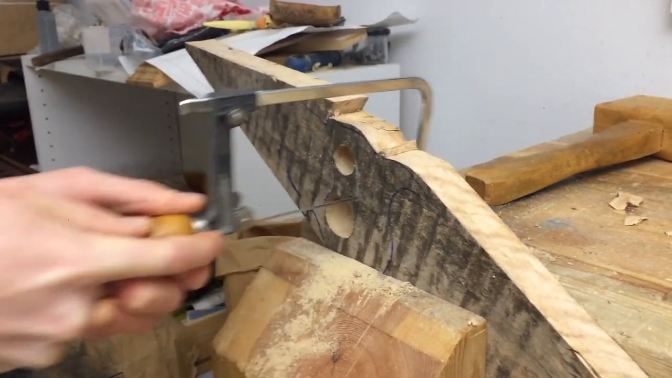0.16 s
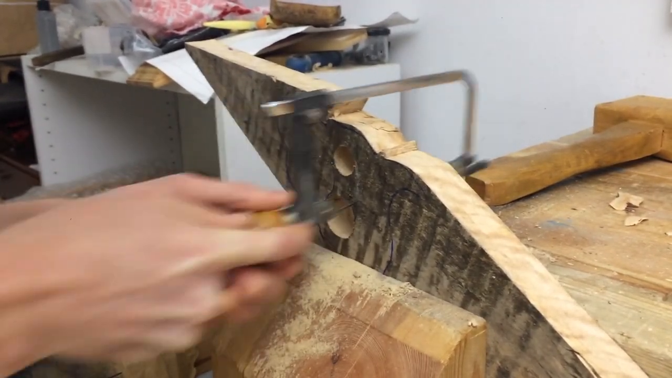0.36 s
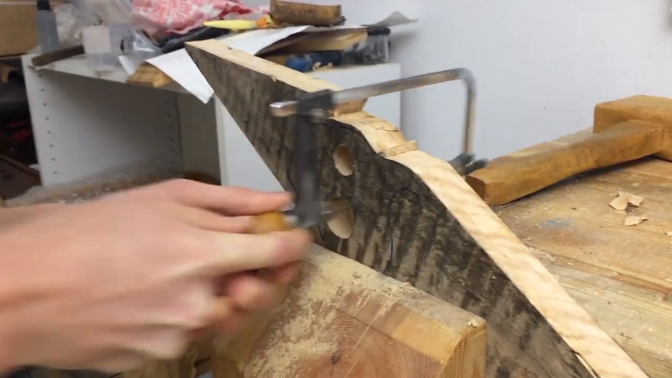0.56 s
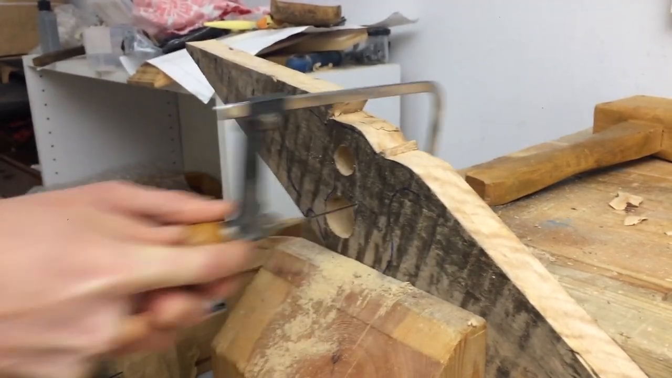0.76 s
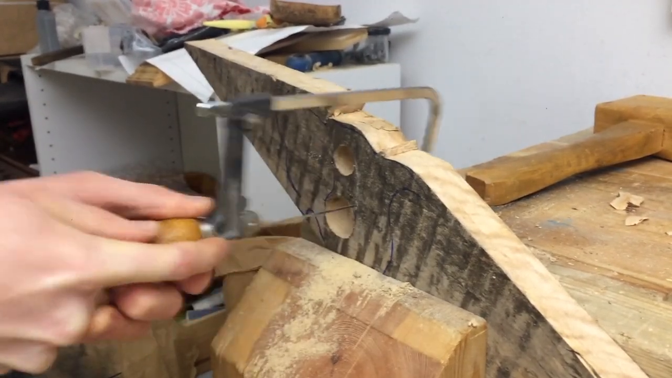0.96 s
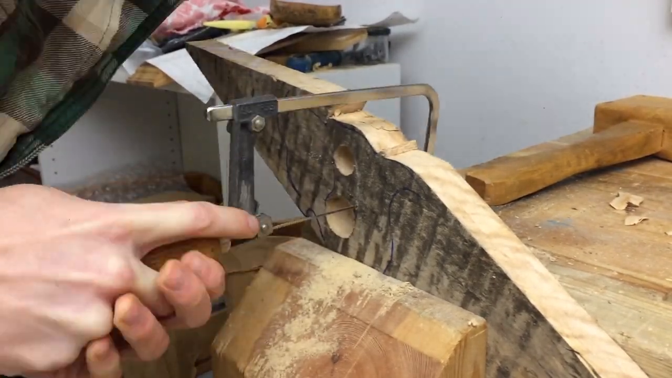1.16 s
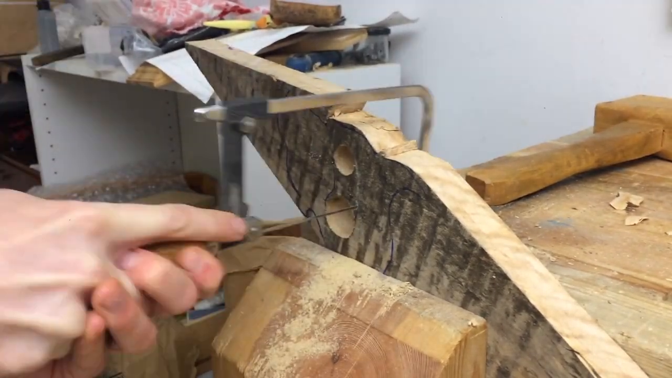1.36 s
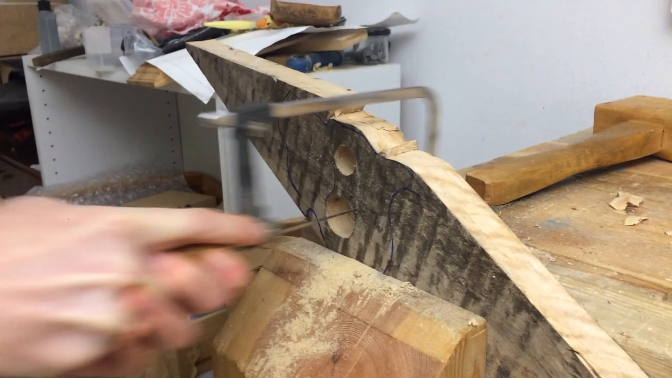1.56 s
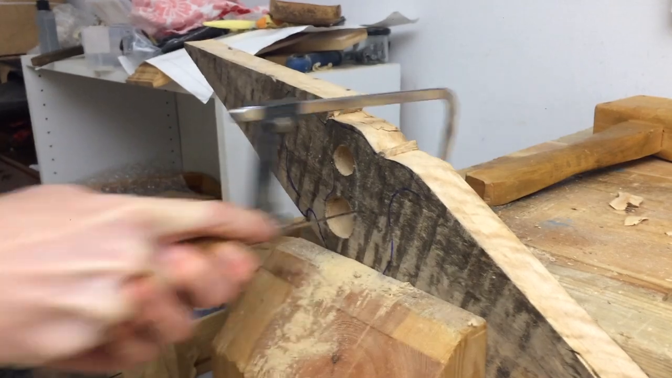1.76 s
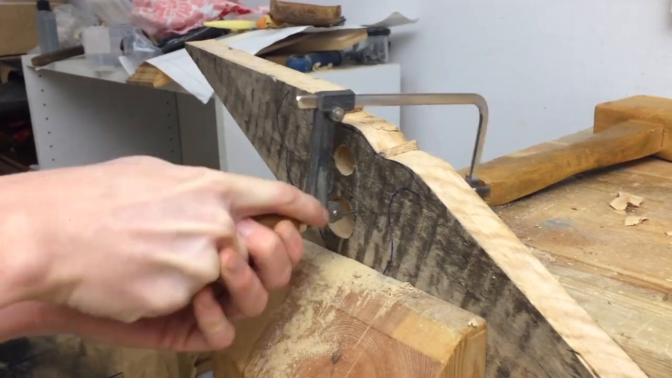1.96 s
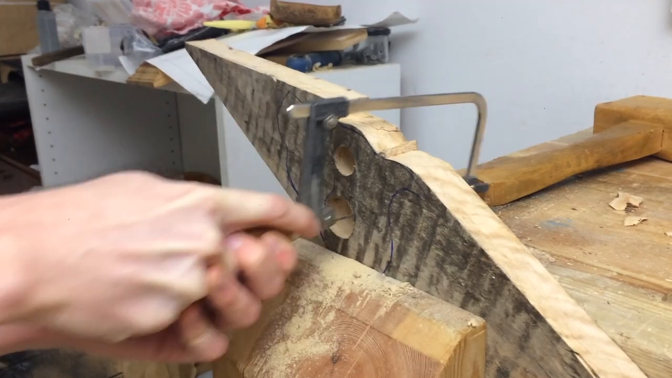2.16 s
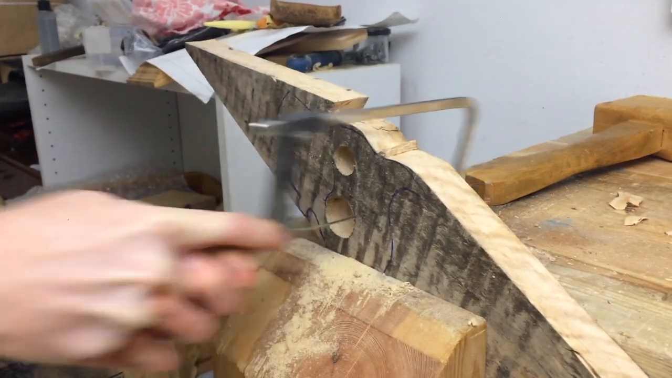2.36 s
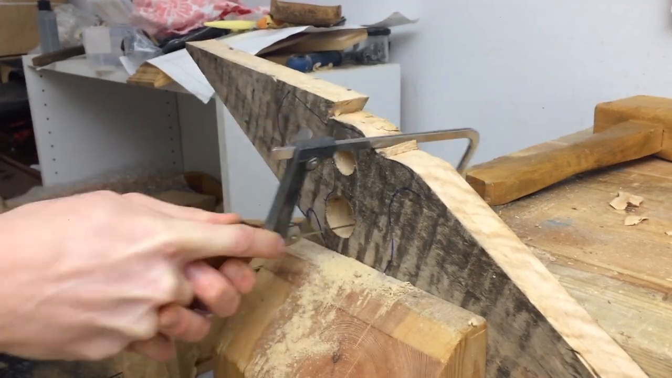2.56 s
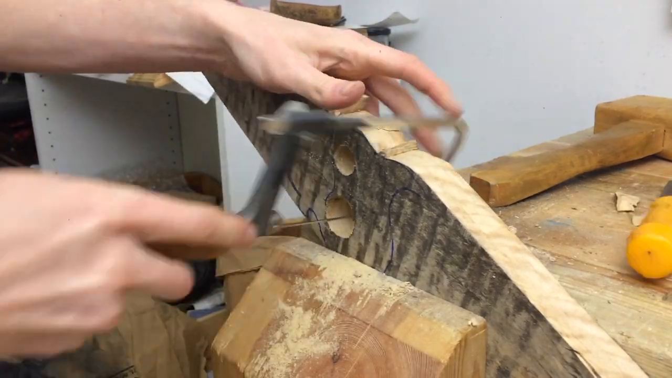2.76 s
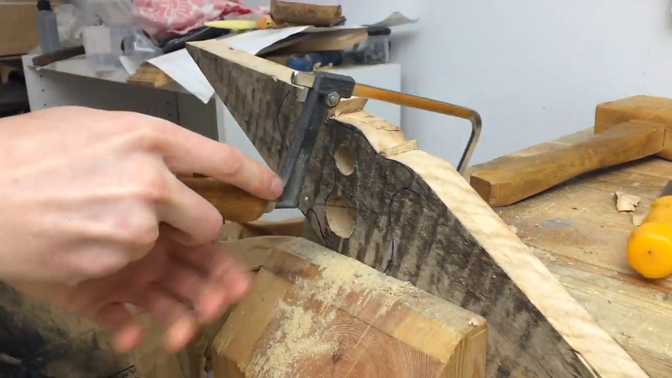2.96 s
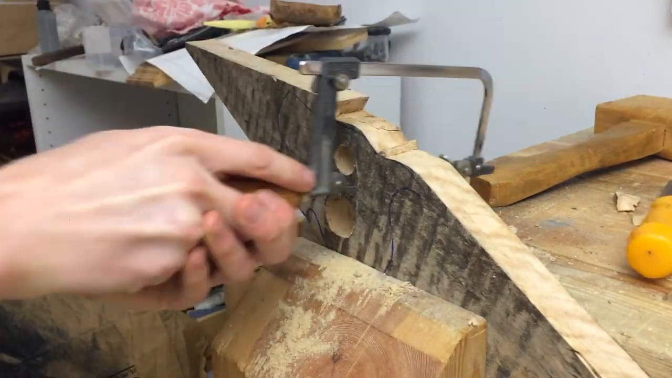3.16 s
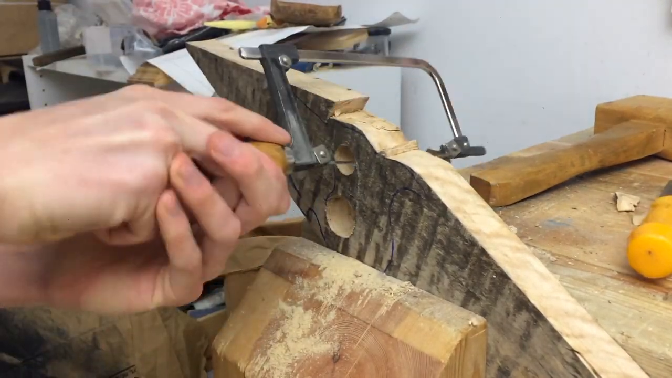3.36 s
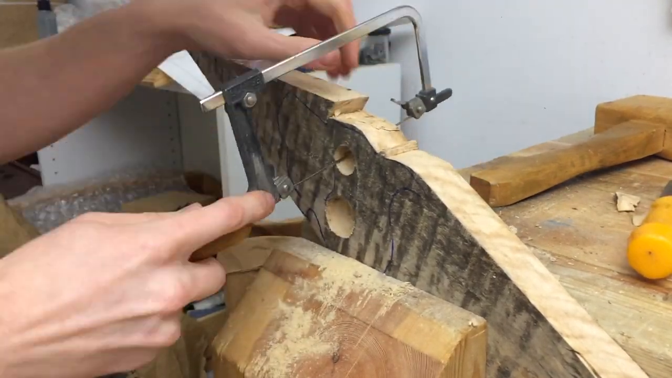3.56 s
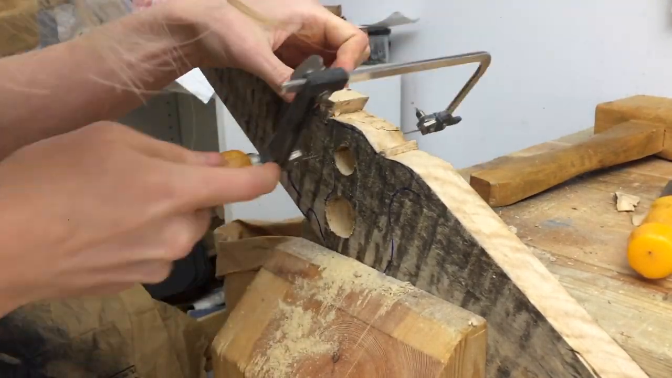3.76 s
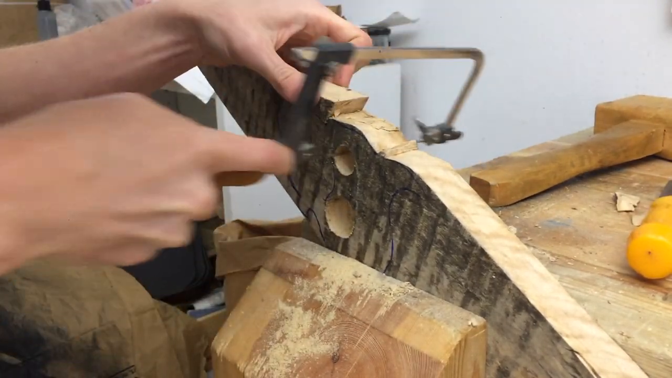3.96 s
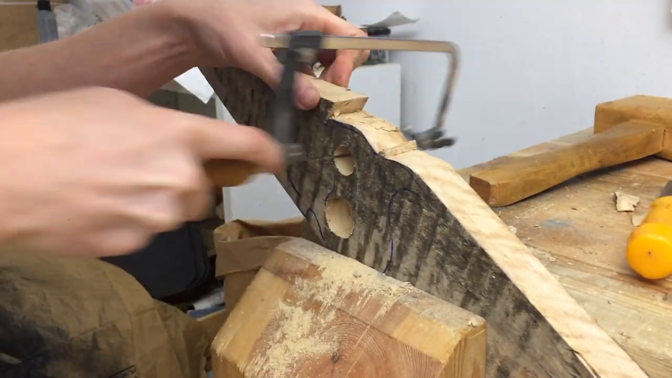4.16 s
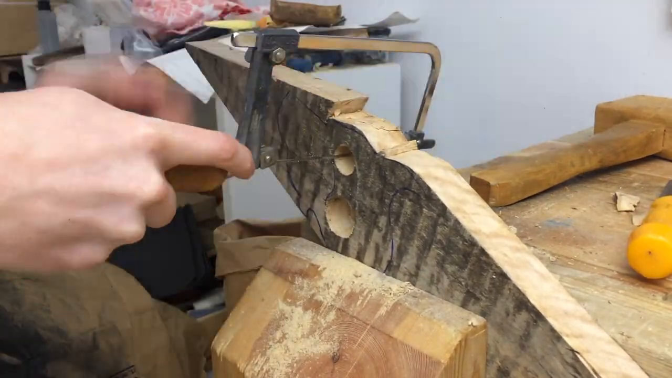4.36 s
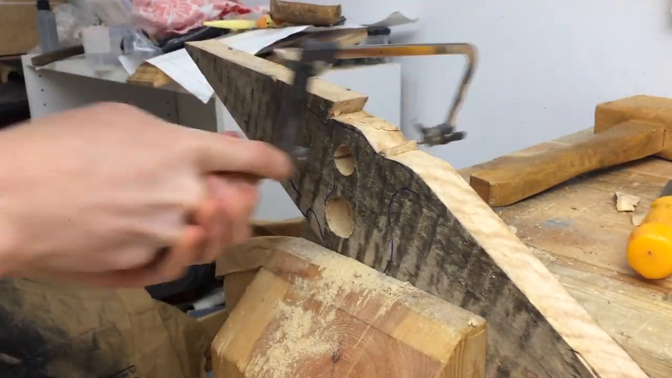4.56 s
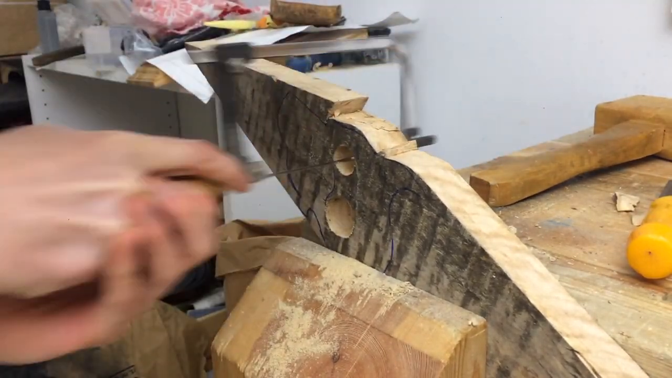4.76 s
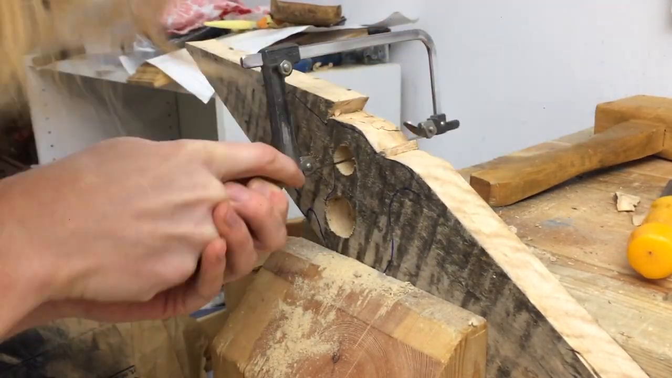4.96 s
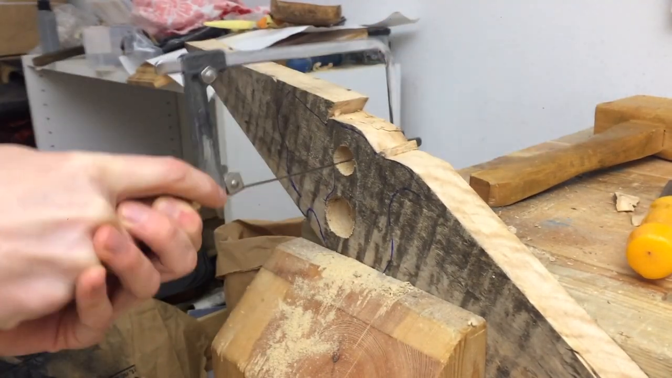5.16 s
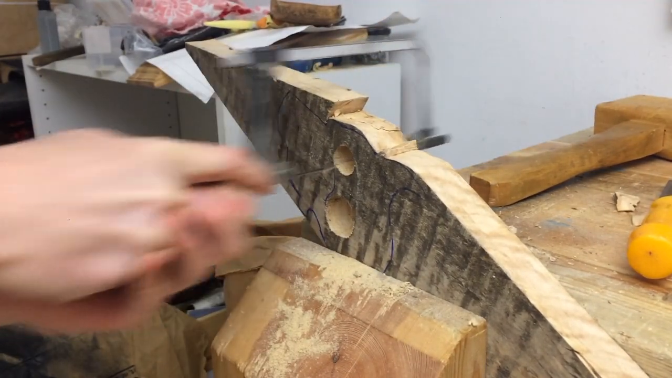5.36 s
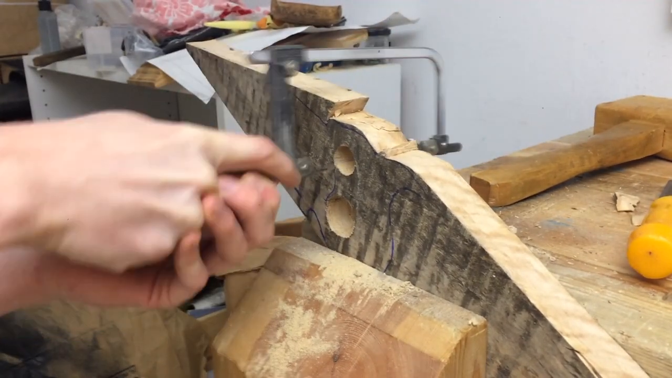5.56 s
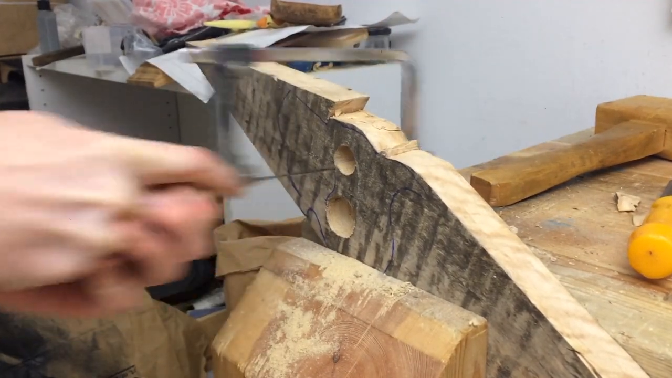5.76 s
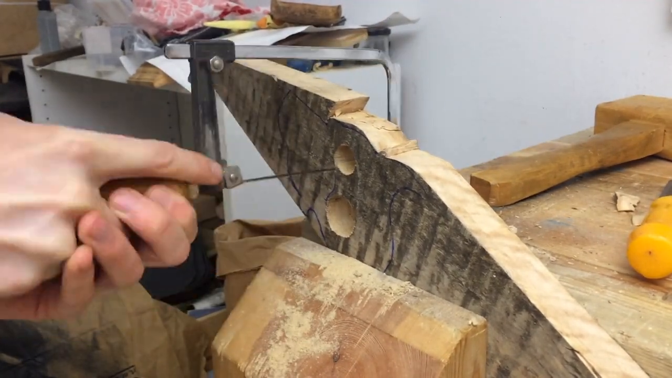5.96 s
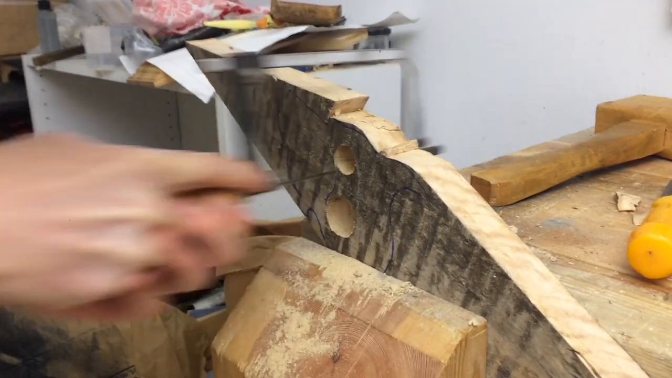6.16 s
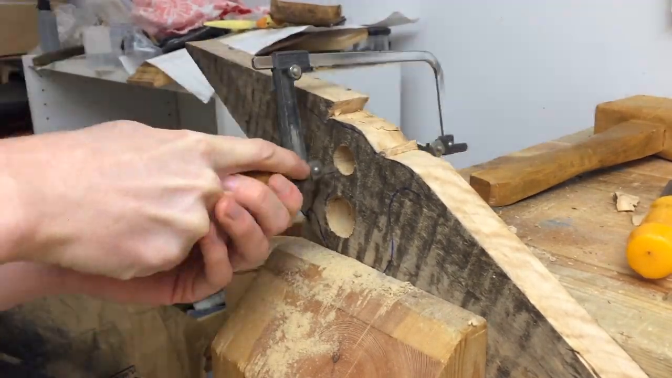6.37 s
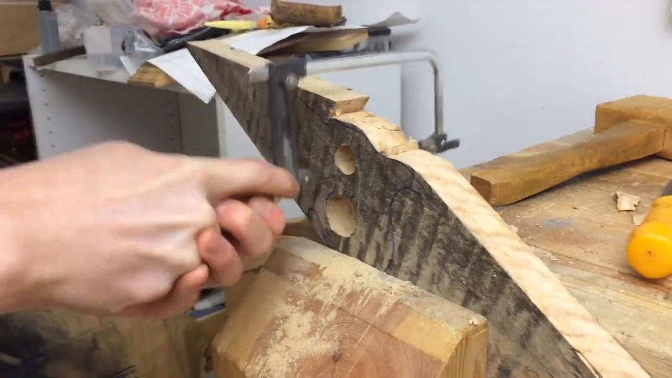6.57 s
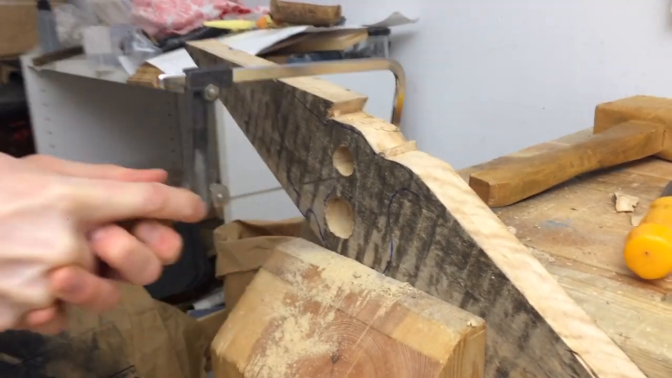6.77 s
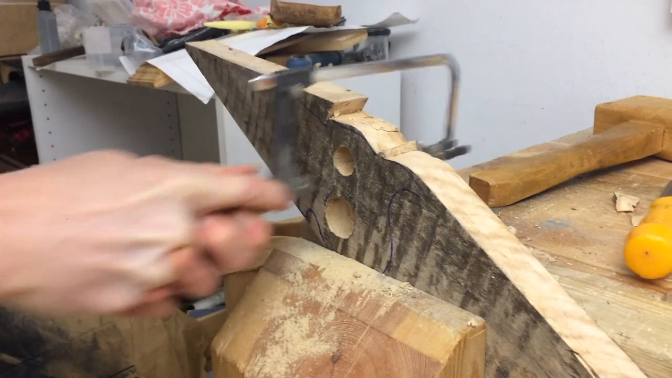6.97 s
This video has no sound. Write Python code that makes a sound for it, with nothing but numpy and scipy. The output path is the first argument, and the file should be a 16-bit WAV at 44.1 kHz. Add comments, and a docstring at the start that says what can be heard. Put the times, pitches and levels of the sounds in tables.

```python
"""Fast-motion coping saw

A coping saw cuts a plank held in a vise in a small workshop, all in fast motion.
Strokes rasp as teeth and torn fibres drive saw and plank; squeals are sine chirps; the return rubs softly.
Knocks at the turns pair a steel tick with a wooden clack; scrapes, a low thud, a room tail and air fill in.
The pace sags while the blade is eased round a corner, then climbs; saw and plank resonances follow it."""
import sys
import numpy as np
from scipy import signal
from scipy.fft import rfft, irfft
from scipy.io import wavfile
from scipy.ndimage import uniform_filter1d, map_coordinates

SR = 44100
rng = np.random.default_rng(int(sys.argv[2]) if len(sys.argv) > 2 else 0)


def log_audio(samples):
    """Write samples as a 16-bit WAV file to the path given in sys.argv[1]."""
    # one column per channel
    frames = np.atleast_2d(samples).T
    # limit to full scale, then quantise
    limited = np.clip(frames, -1, 1)
    pcm = np.round(limited * 32767).astype(np.int16)
    wavfile.write(sys.argv[1], SR, pcm)


N = 308700

# Event levels are relative: each layer adds its own trim in scene().
# A spread is that of the power of a bell-shaped swell.
# pace of the fast motion: t/s, factor on the resonances
PACE_CURVE = [(0, 1), (2.6, 1), (2.8, .68), (3.05, .72), (3.2, .78), (3.35, .87), (3.55, 1.04), (3.8, 1.23),
              (4.0, 1.29), (4.3, 1.315), (7, 1.315)]
# runs of even strokes: first t/s, last t/s, strokes, extra share of first gap, extra share of last gap,
# spread/s, steel level/dB at start, middle and end, wood level/dB, return level/dB, squeal level/dB,
# knock level/dB at the turns
STROKE_RUNS = [(0.017, 0.748, 13, 0.0091, 0.035, 0.0049, -30, -29, -29.5, -43, -47, -27.5, -40.5),
               (0.81, 1.063, 5, 0.1, 0.047, 0.0047, -27, -28.5, -28.5, -41, -48.5, -28, -57),
               (1.401, 1.705, 6, 0.033, -0.097, 0.0042, -25.5, -23.5, -26.5, -40, -47, -28.5, -49),
               (1.815, 1.926, 3, 0.01, 0.076, 0.0043, -28.5, -24, -26, -40.5, -49, -27, -48),
               (2.03, 2.521, 11, 0.097, -0.0053, 0.004, -25, -29, -26.5, -46, -50, -28, -52),
               (3.886, 4.226, 11, 0.14, -0.065, 0.0026, -41, -36, -37, -47, -49, -60, -69),
               (4.556, 4.922, 12, 0.2, -0.093, 0.0031, -37.5, -29, -28.5, -45, -49.5, -57, -53.5),
               (5.032, 5.884, 25, 0.17, -0.047, 0.0034, -31, -30.5, -27.5, -46, -47, -60, -71.5),
               (6.083, 6.243, 5, 0.18, -0.05, 0.0026, -25.5, -29, -29, -41, -44, -34, -52),
               (6.488, 6.995, 15, 0.062, -0.048, 0.0026, -31.5, -26, -31, -41, -42.5, -26, -49)]
# loud squeals, where the teeth lock on to a resonance of the saw: t/s, f/Hz, level/dB
LOUD_SQUEALS = [(0.017, 7180, -19), (0.139, 7090, -15.5), (0.14, 4066, -22.5), (0.943, 7150, -20),
                (1.001, 7130, -15), (1.06, 7180, -24.5), (1.467, 4190, -18.5), (1.526, 6810, -14.5),
                (1.702, 6850, -14), (1.816, 4180, -20.5), (1.87, 6940, -14.5), (1.876, 4380, -18.5),
                (1.924, 6950, -18), (2.032, 4300, -19), (2.135, 7130, -16), (2.182, 7050, -16),
                (2.231, 7020, -18), (2.278, 7100, -12.5), (2.375, 7080, -18.5), (2.425, 6950, -14),
                (3.174, 1840, -31), (3.3, 3350, -31.5), (3.49, 5730, -30), (4.795, 5440, -22.5),
                (4.922, 5290, -24.5), (5.22, 8850, -21), (5.709, 9010, -11.5), (5.886, 4890, -21.5),
                (6.492, 3100, -29), (6.746, 8000, -19), (6.854, 9660, -19), (6.889, 9360, -13)]
# hard or lone jolts of the plank: t/s, wood level/dB, steel tick level/dB
HARD_KNOCKS = [(0.054, -36.5, -51), (0.236, -33.5, -43.5), (0.421, -33.5, -30), (0.541, -32, -39),
               (0.663, -35, -36), (1.262, -57, -69), (1.375, -43.5, -63), (1.455, -43, -42),
               (1.806, -39.5, -31.5), (2.002, -41, -48), (2.565, -40, -29), (2.608, -42, -32),
               (3.169, -41.5, -44.5), (3.485, -35.5, -36.5), (3.639, -57.5, -57.5), (4.357, -68.5, -66),
               (4.422, -55, -64), (4.621, -40, -47), (4.725, -39, -35.5), (4.769, -39.5, -44),
               (4.83, -42, -45), (5.103, -43.5, -42), (6.078, -55, -39.5), (6.226, -39.5, -40),
               (6.404, -58, -66), (6.491, -36.5, -35.5)]
# firm scrapes of the blade in the kerf: t/s, spread/s, steel level/dB, wood level/dB
FIRM_SCRAPES = [(2.571, 0.0058, -34, -60), (2.612, 0.0032, -38, -73), (2.695, 0.0016, -60, -72),
                (2.977, 0.0093, -56.5, -61.5), (3.033, 0.0043, -46, -44.5), (3.069, 0.0069, -43.5, -50),
                (3.119, 0.0052, -55.5, -50.5), (3.165, 0.0057, -35, -43.5), (3.2, 0.0071, -50, -50),
                (3.238, 0.0041, -40.5, -49), (3.269, 0.0038, -39.5, -40), (3.299, 0.0051, -36, -41.5),
                (3.323, 0.0056, -47, -43), (3.353, 0.0039, -43.5, -43.5), (3.488, 0.0058, -42.5, -34.5),
                (3.515, 0.011, -59, -48.5), (4.49, 0.0064, -54.5, -53.5), (4.963, 0.0022, -36, -38),
                (5.0, 0.0042, -58, -49.5), (5.675, 0.0042, -33.5, -36.5), (5.883, 0.0023, -25.5, -37.5),
                (6.286, 0.0039, -42, -49)]
# faint scratching while the blade is twisted: from t/s, to t/s, steel level/dB, wood level/dB
BLADE_TWISTS = [(2.836, 2.95, -64.5, -68.5), (3.584, 3.84, -70.5, -64)]
# resonances and notches of blade and frame at pace 1: f/Hz, width/Hz, level/dB
SAW_MODES = [(3028, 277, 11.5), (3376, 170, -12), (4078, 244, 12.5), (4590, 250, 4), (4850, 160, -3),
             (5310, 360, 3.5), (5420, 36, 6), (5460, 140, -6.5), (6150, 130, 5.5), (6995, 310, 2.5),
             (6930, 230, 9), (7300, 110, 9.5), (8480, 330, 6), (10400, 320, -9), (11470, 1700, 6.5),
             (12100, 260, 4), (12420, 180, -6), (12950, 300, 7), (15300, 360, 11)]
# resonances and notches of the plank in the vise at pace 1: f/Hz, width/Hz, level/dB
PLANK_MODES = [(302, 56, 1.5), (432.5, 73, 11.5), (489, 110, 5.5), (622, 110, -5.5), (784, 330, 2),
               (830, 91, 1), (1030, 71, 0.5), (1316, 220, 8.5), (1416, 210, -7), (1852, 90, 0.5),
               (2016, 160, 7.5), (2380, 50, 5), (2430, 150, 8.5)]
# broad steel colour in the first cut, at pace 1: f/Hz, level/dB
FIRST_CUT_STEEL = [(150, -62.5), (1200, -34), (1700, -14), (2200, -4), (2700, -14.5), (3500, -5.5),
                   (4800, -0.5), (6500, -1), (8200, -6.5), (10500, -6.5), (14000, -8), (17000, -9)]
# broad steel colour in the new kerf, at pace 1: f/Hz, level/dB
NEW_KERF_STEEL = [(150, -54.5), (1000, -19), (1700, -10.5), (2400, 3.5), (2900, -1.5), (3500, 5), (4500, 0),
                  (6500, -1.5), (8200, -1), (10000, -5), (12000, -13), (17000, -15)]
# broad steel colour in the deep kerf, at pace 1: f/Hz, level/dB
DEEP_KERF_STEEL = [(150, -65), (1200, -15), (1800, -11.5), (2400, -4), (3500, -2), (4800, -0.5), (6500, 2),
                   (8200, 0), (10000, -5.5), (12000, -8.5), (17000, -17)]
# broad steel colour of a scrape, at pace 1: f/Hz, level/dB
SCRAPED_STEEL = [(150, -27.5), (500, -16.5), (850, -8), (1250, -13), (2200, 2), (3500, -4), (4800, -1.5),
                 (6500, -5), (8200, -8), (10500, -8), (14000, -15.5), (16000, -1), (22000, -14)]
# broad steel colour of the tick in a knock, at pace 1: f/Hz, level/dB
TICKING_STEEL = [(1200, -11), (3000, 2.5), (5000, -0.5), (7000, -12.5), (9500, -1.5), (12000, -9),
                 (17000, -30)]
# broad plank colour under the cutting stroke, at pace 1: f/Hz, level/dB
RASPED_WOOD = [(30, -36), (70, -28.5), (130, -14), (300, -6.5), (600, 4.5), (1100, 0), (1550, -10.5),
               (2400, -16), (3300, -28), (6000, -41)]
# broad plank colour under a sideways scrape, at pace 1: f/Hz, level/dB
SCRAPED_WOOD = [(30, -35), (130, -18), (300, -8.5), (470, -1.5), (600, 1), (850, 5.5), (1150, -1),
                (1550, -6), (2400, -12), (6000, -44)]
# broad plank colour of a knock, at pace 1: f/Hz, level/dB
KNOCKED_WOOD = [(30, -34), (70, -40.5), (150, -18), (330, -7.5), (550, -2.5), (900, 4), (1550, -1.5),
                (2400, -10.5), (3800, -8), (6000, -11.5), (12000, -51.5)]
# still air of the workshop at pace 1: f/Hz, level/dB
AIR_COLOUR = [(30, -27.5), (110, -19), (200, -3.5), (330, -0.5), (435, 7), (560, -2.5), (1200, -4.5),
              (1700, -8), (7000, -13), (13500, -11), (15300, -13.5), (17000, -28)]

TOP_HZ = 15950  # upper edge of the sound
CORNER_S, DEEP_S = 3.5, 5.0  # the new kerf begins; it is deep
PLANK_RISE = 1.046  # beyond the corner the plank rings higher under the strokes by this factor
SETTLE_STROKES = 0.99  # the arm finds and loses its rhythm within about this many strokes
STEEL_SCATTER_DB, SQUEAL_SCATTER_DB, KNOCK_SCATTER_DB = 1.24, 2.0, 3  # from stroke to stroke
SQUEAL_HZ = 7250  # the resonance of the saw that sings most readily, at pace 1
TURN_SHARE = 0.35  # the saw turns round this share of a cycle ahead of the cut
TURN_TICK_DB = -2.5  # steel tick of an ordinary turn, relative to its knock
NEAR_S = 0.012  # an ordinary event this close to a listed one gives way
# after a rest the blade is set in the kerf just ahead of the run
REST_S, SET_LEAD_S, SET_SPREAD_S, SET_STEEL_DB, SET_WOOD_DB = 0.15, 0.03, 0.0054, -51.5, -49.5
TWIST_PER_S, TWIST_SPREAD_S, TWIST_SCATTER_DB = 29, 0.0061, 4

SIZE = 8192  # samples in one event
T = (np.arange(SIZE) - SIZE // 2) / SR  # time around the event, s
F = np.maximum(np.arange(SIZE // 2 + 1) * SR / SIZE, 1)  # its spectrum bins, Hz


def amp(db):
    """Decibels to gain."""
    return 10 ** (np.asarray(db) / 20)


def pace_at(s):
    """Pace at one moment or at many."""
    return np.interp(s, *np.transpose(PACE_CURVE))


def add(out, s, sound):
    """Mix in a sound centred on time s."""
    at = int(s * SR) - SIZE // 2 + np.arange(SIZE)
    inside = (at >= 0) & (at < N)
    out[at[inside]] += sound[inside]


def colour_db(points, hz):
    """A broad spectrum read on a log-frequency axis."""
    knots, db = np.transpose(points)
    return np.interp(np.log(hz), np.log(knots), db)


def body(colour, modes, pace):
    """Causal response of unit power: resonances on a broad colour, transposed by the pace."""
    hz = F / pace
    db = colour_db(colour, hz)
    for f, width, peak in modes:
        db = db + peak / (1 + (2 * (hz - f) / width) ** 2)
    # folding the cepstrum on to its first half gives minimum phase
    fold = 1 - np.sign(np.arange(SIZE) - SIZE // 2)
    cepstrum = irfft(np.log(amp(db))) * fold
    cepstrum[0] /= 2
    response = np.exp(rfft(cepstrum))
    power = np.mean(abs(response) ** 2 * (F < TOP_HZ))
    return response / np.sqrt(power)


def ring(force, response):
    """A force sounds through a body."""
    return irfft(rfft(force) * response)


def swell(spread, centre=0, skew=0):
    """Bell-shaped rise and fall of blade speed; skew makes the fall the longer side."""
    side = 1 + skew * np.sign(T - centre)
    return np.exp(-((T - centre) / (2 * spread * side)) ** 2)


def wobble(seconds):
    """Smooth chance of unit spread."""
    size = max(int(seconds * SR), 2)
    slow = uniform_filter1d(uniform_filter1d(rng.standard_normal(SIZE), size), size)
    return slow / slow.std()


def fibres(grain_db):
    """Tearing wood fibres: dense cracks that come in clumps of limited strength."""
    clumps = 2 * np.tanh(wobble(.0004) / 2)
    cracks = rng.standard_normal(SIZE) * amp(grain_db * clumps)
    cracks = 2 * np.tanh(cracks / (2 * cracks.std()))
    return cracks / cracks.std()


def teeth(hz, arch_s, jitter, lead_s=0):
    """Teeth strike the kerf at a rate that rises and falls with blade speed."""
    arch = 1 / (1 + ((T - lead_s) / arch_s) ** 2)
    rate = hz * arch * (1 + jitter * wobble(0.0006))
    return np.sqrt(2) * np.sin(2 * np.pi * np.cumsum(rate) / SR)


def air(level_db=-71, hiss_db=-81):
    """Faint room noise, whose colour slides with the pace, over a thin even hiss."""
    hz = np.maximum(np.arange(N + 1) * SR / (2 * N), 1)
    room = irfft(rfft(rng.standard_normal(2 * N)) * amp(colour_db(AIR_COLOUR, hz)))
    # reading the noise at the speed of the pace transposes it
    position = np.cumsum(pace_at(np.arange(N) / SR))
    room = map_coordinates(room, [position], order=3, mode="wrap")
    return amp(level_db) * room / room.std() + amp(hiss_db) * rng.standard_normal(N)


def unless_near(event, table):
    """The event as a list, empty where one of the table takes its place."""
    return [event] if all(abs(event[0] - row[0]) > NEAR_S for row in table) else []


def sawing():
    """The arm's rhythm: each run eases in and out; strokes cut, sing a little and turn with a knock."""
    cuts, sings, turns = [], [], []
    for (first, last, count, ease_in, ease_out, spread,
         start, middle, end, wood, back, squeal, knock) in STROKE_RUNS:
        count = int(round(count))
        unsettled = np.exp(-np.arange(count - 1) / SETTLE_STROKES)
        gaps = 1 + ease_in * unsettled + ease_out * unsettled[::-1]
        progress = np.append(0, np.cumsum(gaps))
        progress /= progress[-1]
        cycle = (last - first) / (count - 1)
        for u, chance in zip(progress, rng.standard_normal((count, 3))):
            s = first + u * (last - first)
            steel = np.interp(2 * u, np.arange(3), [start, middle, end]) + STEEL_SCATTER_DB * chance[0]
            cuts.append((s, cycle, spread, steel, wood, back))
            sing = squeal + SQUEAL_SCATTER_DB * chance[1]
            sings += unless_near((s, SQUEAL_HZ * pace_at(s), sing), LOUD_SQUEALS)
            jolt = knock + KNOCK_SCATTER_DB * chance[2]
            if u > 0:
                turn = (s - TURN_SHARE * cycle, jolt, jolt + TURN_TICK_DB)
                turns += unless_near(turn, HARD_KNOCKS)
    return cuts, sings, turns


def kerf_colour(s):
    """The first cut is bright; the new kerf starts dull and brightens once it is deep."""
    if s < CORNER_S:
        return FIRST_CUT_STEEL
    return NEW_KERF_STEEL if s < DEEP_S else DEEP_KERF_STEEL


def strokes(cuts, out_db, wood_db, return_db, crumb_db, tooth_share, tooth_hz, detune):
    """Teeth and fibres drive saw and plank; the blade then slides back over crumbs with little pressure."""
    out = np.zeros(N)
    for s, cycle, spread, steel, wood, back in cuts:
        pace = pace_at(s)
        speed, load, lead = rng.standard_normal(3)  # no two strokes are alike
        saw = body(kerf_colour(s), SAW_MODES, pace * (1 + 0.007 * load))  # pressure tightens the blade
        rise = PLANK_RISE if s > CORNER_S else 1
        plank = body(RASPED_WOOD, PLANK_MODES, pace * (1 + detune * load) * rise)
        push = swell(spread, skew=.08)
        slide = swell(0.08 * cycle, .5 * cycle)
        tooth_rate = tooth_hz * pace * (1 + 0.15 * speed)
        bite = teeth(tooth_rate, 3.2 * spread, jitter=.045, lead_s=0.38 * spread * lead)
        cut = (fibres(grain_db=7.5) + tooth_share * bite) * push * amp(steel + out_db)
        rub = rng.standard_normal(SIZE) * slide * amp(back + return_db)  # no fibres tear on the way back
        shake = fibres(grain_db=2) * swell(1.12 * spread) * amp(wood + wood_db)
        crumbs = fibres(grain_db=11.0) * swell(0.3 * cycle, .5 * cycle) * amp(back + crumb_db)
        add(out, s, ring(cut + rub, saw) + ring(shake + crumbs, plank))
    return out


def squeals(rows, level_db, spread_s, tail_db, tail_s):
    """A chirp builds at the height of the stroke and rings on briefly in the blade."""
    out = np.zeros(N)
    for s, hz, db in rows:
        pace = pace_at(s)
        chirp = teeth(hz, 0.055 / pace, jitter=0.022, lead_s=-0.00101) * swell(spread_s / pace)
        fade = np.exp(-abs(T) * pace / tail_s) * np.clip(T / 0.0027, 0, 1)
        tail = np.sin(2 * np.pi * hz * T) * fade
        add(out, s, amp(db + level_db) * (chirp + amp(tail_db) * tail))
    return out


def workshop(sound, low_db, high_db, low_t60, high_t60):
    """Bench and close walls return a short tail that lasts longer in the bass."""
    t = np.arange(SIZE * 2) / SR
    echo = 0
    for kind, db, t60 in (("low", low_db, low_t60), ("high", high_db, high_t60)):
        tail = rng.standard_normal(len(t)) * amp(-60 * t / t60) * np.clip(t / 0.0029, 0, 1)
        tail /= np.linalg.norm(tail)
        band = signal.butter(N=3, Wn=2200, btype=kind, fs=SR, output="sos")
        echo = echo + amp(db) * signal.sosfilt(band, tail)
    return sound + signal.fftconvolve(sound, echo)[:N]


def knocks(rows, wood_db, tick_db, decay_s, tick_s, spread_s, bright_hz):
    """A steel tick and a clack whose bass comes late: low bending waves travel slower in the plank."""
    out = np.zeros(N)
    for s, wood, tick in rows:
        pace = pace_at(s)
        # delay is spread_s / pace at 1 kHz and grows as 1 / sqrt(f) below
        bending = np.exp(-4j * np.pi * spread_s / pace * np.sqrt(F * 1000))
        corner_hz = bright_hz * amp(0.86 * (tick + 49.5))
        contact = 1 / (1 + 1j * F / corner_hz) ** 2  # soft contacts are dull
        rattle = fibres(grain_db=1.0) * (T >= 0) * np.exp(-abs(T) * pace / decay_s)
        clack = ring(rattle, body(KNOCKED_WOOD, PLANK_MODES, pace) * bending * contact)
        clack /= np.sqrt(np.sum(clack ** 2) / (0.0088 * SR))  # even energy before the level is set
        snap = fibres(grain_db=-12.0) * (T >= 0) * np.exp(-abs(T) / tick_s)
        click = ring(snap, body(TICKING_STEEL, SAW_MODES, pace))
        add(out, s - .001, amp(wood + wood_db) * clack)
        add(out, s, amp(tick + tick_db) * click)
    return out


def light_scrapes():
    """The blade is set down after each rest and scratches at random while it is twisted."""
    rows = []
    for before, run in zip(STROKE_RUNS, STROKE_RUNS[1:]):
        if run[0] - before[1] > REST_S:
            rows.append((run[0] - SET_LEAD_S, SET_SPREAD_S, SET_STEEL_DB, SET_WOOD_DB))
    for start, end, steel, wood in BLADE_TWISTS:
        for slot in np.arange(start, end, 1 / TWIST_PER_S):
            s = slot + .5 * rng.random() / TWIST_PER_S
            db = TWIST_SCATTER_DB * rng.standard_normal()
            rows.append((s, TWIST_SPREAD_S, steel + db, wood + db))
    return rows


def scrapes(rows, steel_db, wood_db):
    """The blade is nudged and twisted; a few teeth catch quickly and let go slowly."""
    out = np.zeros(N)
    for s, spread, steel, wood in rows:
        pace = pace_at(s)
        force = fibres(grain_db=2.5) * swell(spread, skew=0.2)
        saw = body(SCRAPED_STEEL, SAW_MODES, pace) * amp(steel + steel_db)
        plank = body(SCRAPED_WOOD, PLANK_MODES, pace) * amp(wood + wood_db)
        add(out, s, ring(force, saw + plank))
    return out


def bump(s, hz, db, decay_s):
    """A soft low thud while the grip changes: a decaying sine with a gentle onset."""
    out = np.zeros(N)
    fade = np.exp(-abs(T) / decay_s) * np.clip(T / 0.011, 0, 1)
    add(out, s, amp(db) * np.sin(2 * np.pi * hz * T) * fade)
    return out


def scene():
    """Saw and plank in the room."""
    cuts, sings, turns = sawing()
    room_air = air()
    saw = strokes(cuts, out_db=-1.0, wood_db=-0.26, return_db=4.0, crumb_db=-8,
                  tooth_share=0.37, tooth_hz=5460, detune=0.022)
    saw += squeals(LOUD_SQUEALS + sings, level_db=-2.07, spread_s=0.0014, tail_db=-5.5, tail_s=0.0058)
    saw += knocks(HARD_KNOCKS + turns, wood_db=1.0, tick_db=10.5, decay_s=0.0054, tick_s=0.001,
                  spread_s=0.002955, bright_hz=7000)
    saw += scrapes(FIRM_SCRAPES + light_scrapes(), steel_db=1.7, wood_db=-3.0)
    saw += bump(s=2.885, hz=153, db=-63.0, decay_s=0.032)
    in_room = workshop(saw, low_db=-7.0, high_db=-19.0, low_t60=0.093, high_t60=0.06)
    return (in_room + room_air)[None]


def record(dry):
    """A steep low-pass cuts the top."""
    return signal.sosfilt(signal.ellip(10, .2, 75, TOP_HZ, fs=SR, output="sos"), dry)


dry = scene()
out = record(dry)
log_audio(out)
```